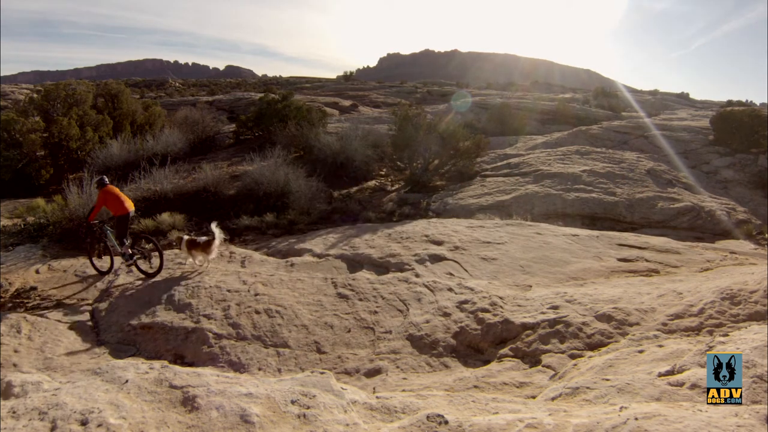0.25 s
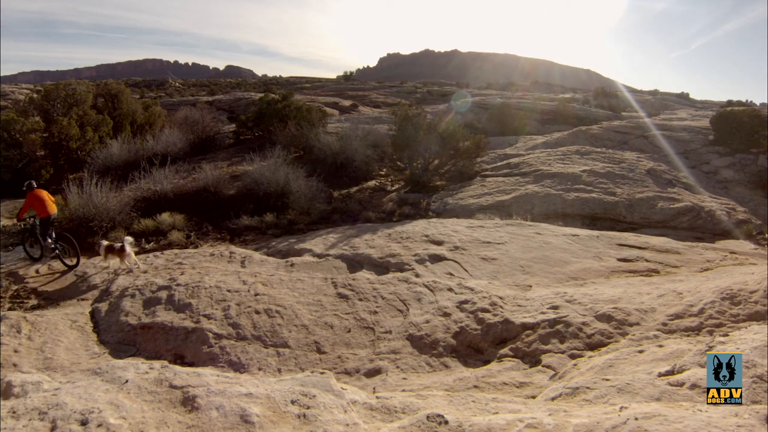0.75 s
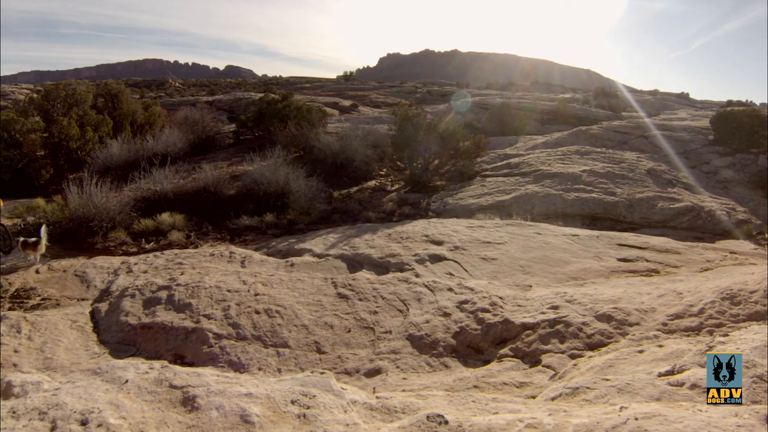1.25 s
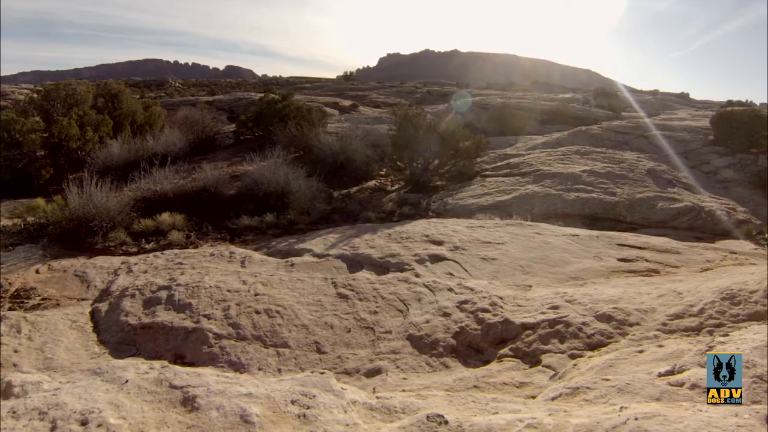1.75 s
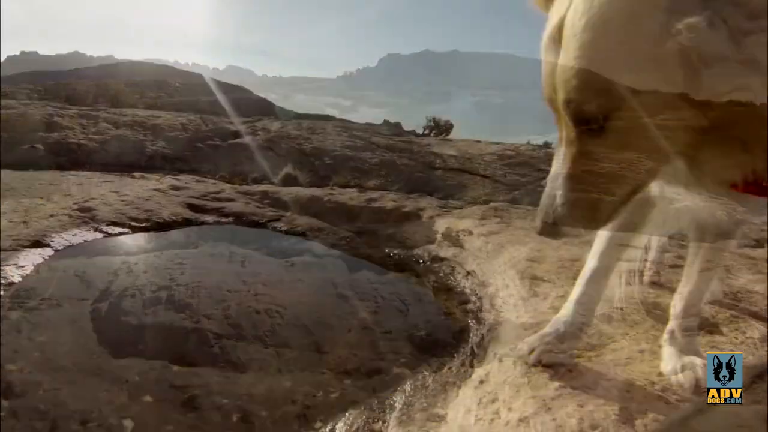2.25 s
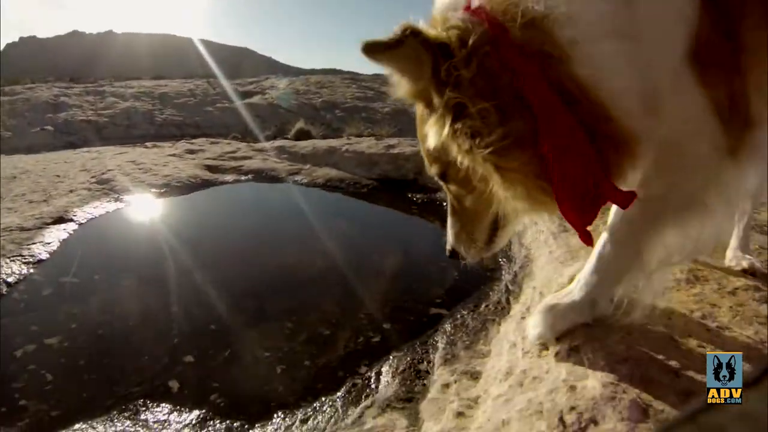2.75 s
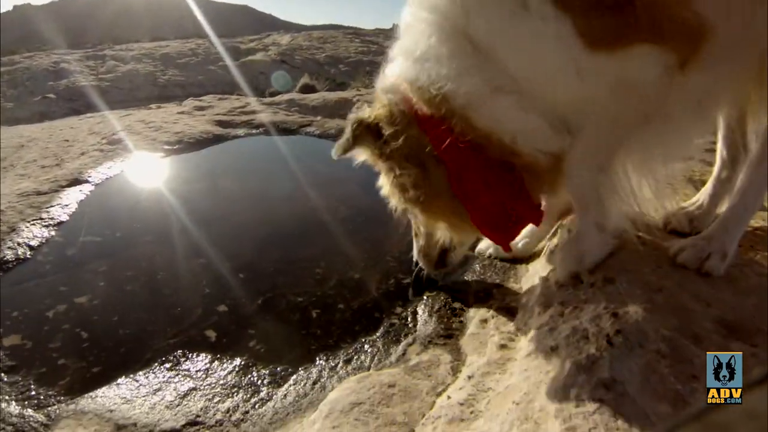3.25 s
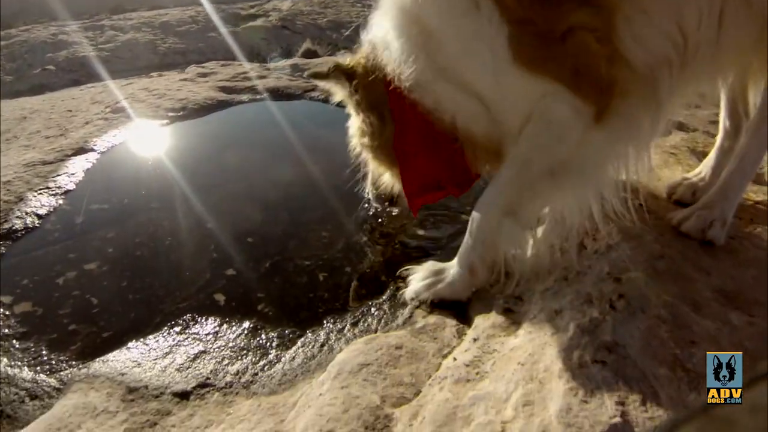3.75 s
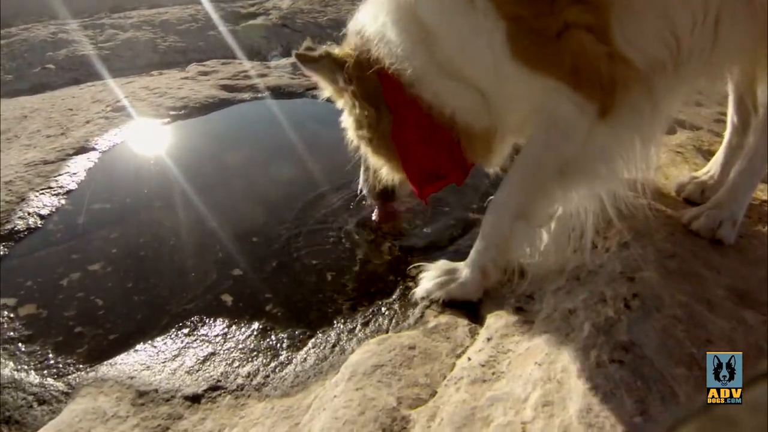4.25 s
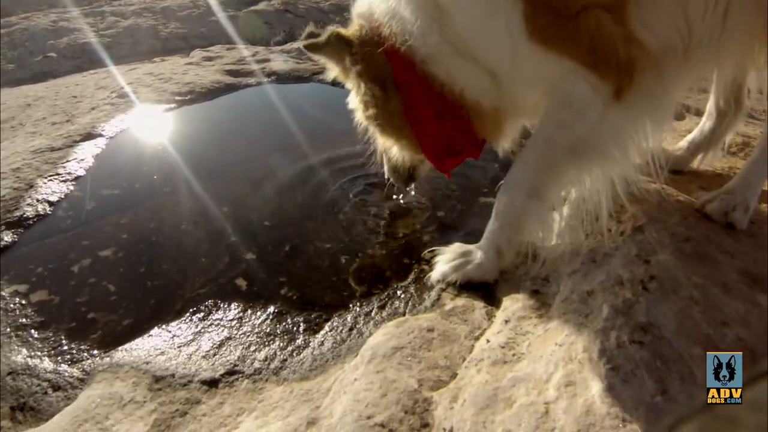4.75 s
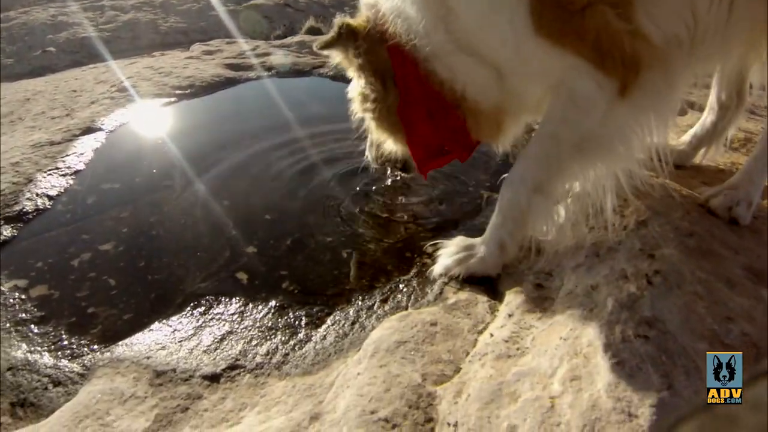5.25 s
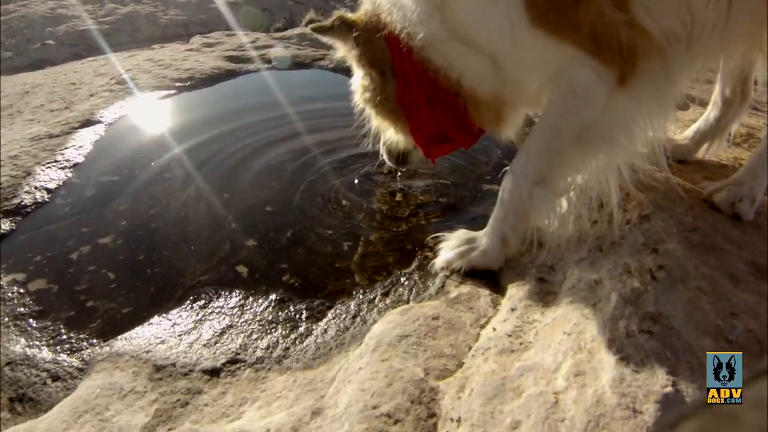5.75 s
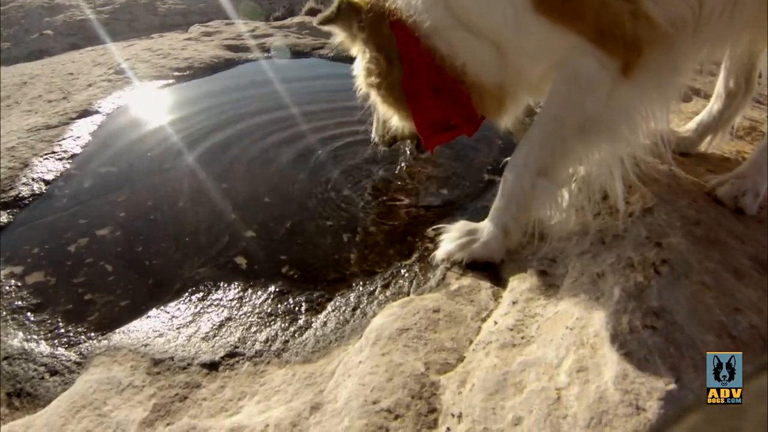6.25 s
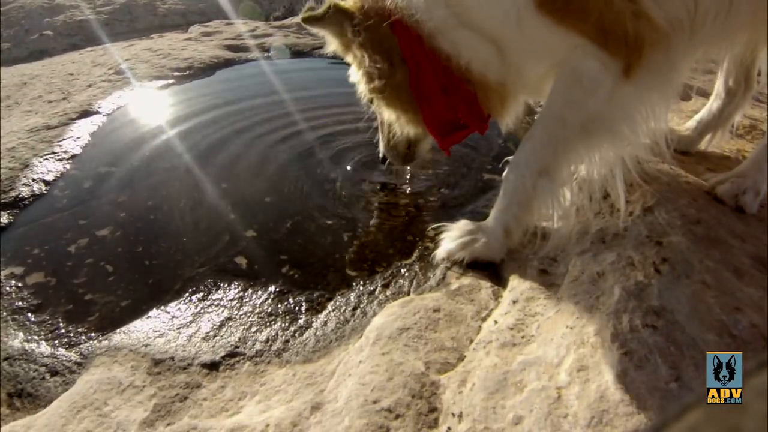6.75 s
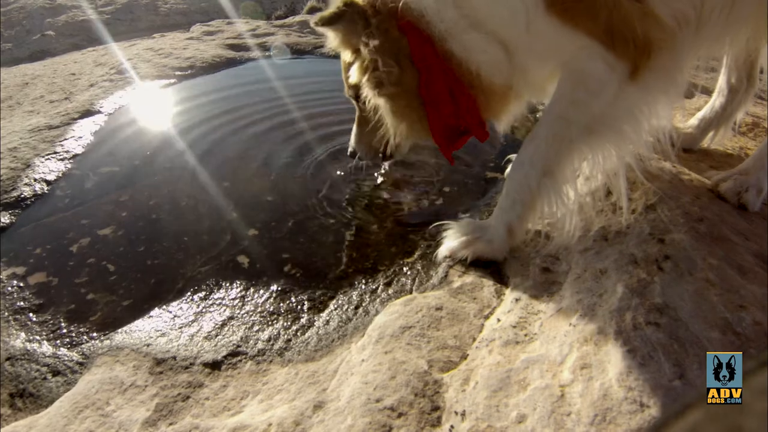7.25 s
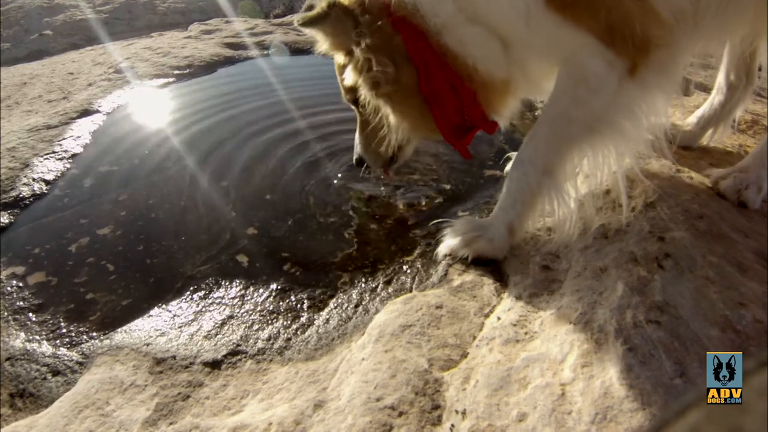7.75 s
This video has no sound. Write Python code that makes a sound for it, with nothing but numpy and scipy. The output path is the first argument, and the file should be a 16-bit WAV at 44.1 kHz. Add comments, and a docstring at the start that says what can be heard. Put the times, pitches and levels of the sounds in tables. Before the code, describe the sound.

First a bike bumps and crunches over rock, its hiss thinning as it leaves, with one faint creak. Then the sound switches to a quiet pool, steady low noise behind. Something strikes the microphone case hard, clipping briefly. A dog's tongue then scoops water about three times a second, stirred strongly at first by a paw, later lighter and regular, with soft drips. Open air, close microphone, very narrow stereo.

```python
"""A dog laps at a rock pool: low blips and small plinks ring as damped sines, bubbles gurgle, contacts tick.
Blows ring the damped modes of a camera case; each part has its own dull colouring; a paw thuds on rock.
Before this, a bicycle rolls away over bare rock: shaped noise makes tyre crunch, freewheel hiss and rumble,
with jolts and one creak. A faint noise floor and breeze lie behind; the sound is almost mono."""
import sys
import numpy as np
from scipy import signal
from scipy.fft import rfft, irfft, next_fast_len
from scipy.io import wavfile
from scipy.ndimage import map_coordinates

SR = 44100
rng = np.random.default_rng(int(sys.argv[2]) if len(sys.argv) > 2 else 0)


def dump_mix(stems):
    """Bounce the given channels to the path in sys.argv[1] as a 16-bit WAV at rate SR."""
    frames = np.atleast_2d(stems).T  # one column per channel
    limited = np.clip(frames, -1, 1)  # hard clip at full scale
    pcm = np.round(limited * 32767).astype(np.int16)
    wavfile.write(sys.argv[1], SR, pcm)


N = 353241


def amp(db):
    """Decibels to linear gain."""
    return 10 ** (np.asarray(db) / 20)


def unit(x):
    """Scales a signal to rms 1."""
    return x / np.sqrt(np.mean(x ** 2) + 1e-20)


def along(points, hz):
    """Reads a (Hz, value) curve on a log frequency axis."""
    f, v = np.transpose(points)
    return np.interp(np.log(hz + 1), np.log(f + 1), v)


def curves(rows):
    """Draws one automation curve, a value per sample, for each column after the time."""
    s, *cols = np.transpose(rows)
    return [np.interp(np.arange(N) / SR, s, c) for c in cols]


def wobble(rate):
    """A smooth random curve with rate knots a second."""
    return map_coordinates(rng.standard_normal(int(N * rate / SR) + 4), [np.arange(N) * rate / SR])


def filtered(x, response):
    """Multiplies the spectrum of x by a response of frequency."""
    m = next_fast_len(N + SR // 2)
    return irfft(rfft(x, m) * response(np.fft.rfftfreq(m, 1 / SR)), m)[..., :N]


def noise(spectrum, rough_db, rate):
    """Coloured noise of rms 1 whose level flutters."""
    raw = rng.standard_normal(N) * amp(rough_db * wobble(rate))
    return unit(filtered(raw, lambda hz: amp(along(spectrum, hz))))


def place(times, sounds):
    """Sums one row of sound for each start time."""
    at = np.round(np.asarray(times) * SR).astype(int)[:, None] + np.arange(sounds.shape[1])
    return np.bincount(at.ravel(), sounds.ravel(), N + SR)[:N]


def blips(db, hz, t60, rise, attack, size):
    """Damped sines, one row each; the pitch climbs by the share rise over the decay time."""
    t = np.arange(size) / SR
    db, hz, t60 = (np.asarray(v)[:, None] for v in (db, hz, t60))
    turns = hz * (t + .5 * rise * t * t / t60)
    envelope = amp(db - 60 * t / t60) * (1 - np.exp(-t / attack))
    return envelope * np.sin(2 * np.pi * turns)


def bursts(times, db, t60, attack, size, band_hz):
    """Short decaying bursts of band-passed noise, each scaled to its stated peak."""
    t = np.arange(size) / SR
    envelope = amp(-60 * t / t60) * (1 - np.exp(-t / attack))
    rows = rng.standard_normal((len(times), size)) * envelope
    rows = signal.sosfilt(signal.butter(3, band_hz, "bandpass", fs=SR, output="sos"), rows)
    peaks = np.abs(rows).max(1, keepdims=True)
    return place(times, rows / peaks * amp(db)[:, None])


def swells(top_s, db, width_s):
    """Rounded level swells, 10 dB down at width_s either side of the top."""
    t = (np.arange(8192) - 4096) / SR
    return place(top_s + t[0], amp(db[:, None] - 10 * np.abs(t / width_s) ** 1.4))


# Low pitched blips, plops of water and some knocks on the case: start_s [s],
# level_db [dB, before the ring and wash trims], pitch_hz [Hz, before a 0.96 scaling], t60_s [s]
LOW_BLIPS = [(2.817, -41, 515, 0.023), (2.925, -32.5, 800, 0.01), (3.537, -38.5, 540, 0.02),
             (3.646, -35, 750, 0.017), (3.658, -34.5, 1030, 0.023), (3.818, -35, 1130, 0.017),
             (3.834, -19.5, 1180, 0.0044), (3.849, -32.5, 830, 0.013), (3.868, -30, 1200, 0.0077),
             (3.948, -35.5, 990, 0.023), (4.02, -43, 920, 0.028), (4.087, -34, 1015, 0.01),
             (4.106, -23, 1110, 0.0068), (4.131, -23.5, 655, 0.0022), (4.209, -39, 690, 0.03),
             (4.244, -39, 705, 0.033), (4.311, -32, 630, 0.039), (4.33, -42, 835, 0.035),
             (4.336, -14.5, 730, 0.034), (4.365, -28, 740, 0.0079), (4.409, -32.5, 775, 0.033),
             (4.426, -28, 790, 0.015), (4.448, -26, 720, 0.0046), (4.48, -38, 900, 0.012),
             (4.506, -29, 910, 0.024), (4.526, -14.5, 730, 0.0075), (4.539, -14, 610, 0.026),
             (4.548, -23, 590, 0.015), (4.651, -30, 700, 0.014), (4.665, -11.5, 695, 0.016),
             (4.671, -16.5, 634, 0.029), (4.711, -34, 1160, 0.0227), (4.729, -26.5, 830, 0.0072),
             (4.744, -26, 680.9, 0.0095), (4.949, -36, 768, 0.011), (4.958, -28, 700, 0.026),
             (4.987, -40.5, 1150, 0.029), (5.053, -38.5, 1160, 0.023), (5.06, -32, 1080, 0.017),
             (5.087, -25.5, 850, 0.012), (5.118, -32, 780, 0.0096), (5.345, -36.5, 960, 0.013),
             (5.353, -30.5, 1163, 0.027), (5.374, -31, 840, 0.012), (5.402, -32.5, 680, 0.01),
             (5.499, -32.5, 560, 0.0063), (5.551, -39, 690, 0.037), (5.694, -20.5, 1105, 0.018),
             (5.701, -28, 1010, 0.025), (5.716, -10.5, 826, 0.015), (5.727, -32, 590, 0.06),
             (5.772, -26.5, 810, 0.021), (5.884, -35, 503, 0.017), (5.994, -36, 1010, 0.022),
             (6.001, -28.5, 1110, 0.029), (6.019, -25, 770, 0.0074), (6.065, -36, 890, 0.0072),
             (6.138, -36, 467, 0.016), (6.346, -31, 950, 0.019), (6.353, -27.5, 1094, 0.032),
             (6.38, -32, 730, 0.022), (6.667, -32, 1044, 0.024), (6.677, -28, 640, 0.0055),
             (6.684, -30, 800, 0.0086), (6.691, -29.5, 680, 0.013), (6.72, -34.5, 640, 0.01),
             (6.731, -33.5, 900, 0.013), (6.785, -35.5, 620, 0.0098), (6.81, -40, 520, 0.018),
             (6.853, -28.5, 646, 0.012), (6.872, -27.5, 790, 0.0058), (7.014, -28, 983, 0.03),
             (7.042, -33, 840, 0.0067), (7.083, -35, 830, 0.012), (7.117, -44, 650, 0.025),
             (7.199, -36, 700, 0.014), (7.281, -33.5, 624, 0.021), (7.32, -29.5, 1110, 0.038),
             (7.339, -29, 674, 0.01), (7.365, -29, 734, 0.009), (7.396, -42, 720, 0.025),
             (7.447, -41, 520, 0.025), (7.674, -40, 940, 0.03), (7.681, -39, 1000, 0.015),
             (7.707, -23, 620, 0.0051), (7.739, -33.5, 570, 0.042), (7.755, -38, 644, 0.018),
             (7.775, -41, 765, 0.025), (7.791, -41.5, 830, 0.012), (8.002, -19, 635, 0.0097)]
# Wet noise around low blips and stirred water: frequency_hz [Hz], density_db [relative dB per Hz]
WASH_SPECTRUM = [(200, -24), (420, -4), (650, -4), (1100, -6), (1450, -21.5), (2600, -21.5), (5000, -53)]
# Fine spray, strongest in a band near the vent of the case: frequency_hz [Hz], density_db [relative dB per Hz]
FIZZ_SPECTRUM = [(1200, -18), (1700, -3), (2250, -0.5), (2600, 0), (3000, -3), (3500, -9), (5000, -12.5),
                 (9000, -30), (14000, -43)]
BLIP_ATTACK = 0.051  # share of a blip's decay time


def low_blips():
    """A damped sine rings briefly, climbing in pitch, with a ragged wet wash and a little spray."""
    s, db, hz, t60 = np.transpose(LOW_BLIPS)
    attack = BLIP_ATTACK * t60[:, None]
    ring = place(s, blips(db + 7.5, 0.96 * hz, t60, rise=0.19, attack=attack, size=2048))
    t = np.arange(2048) / SR
    swell = place(s, amp(db[:, None] - 14.0 - 60 * t / 0.047) * (1 - np.exp(-t / 0.00055)))
    wash = noise(WASH_SPECTRUM, rough_db=4.5, rate=200)
    spray = amp(-19) * noise(FIZZ_SPECTRUM, rough_db=6, rate=200)
    return ring + swell * (wash + spray)


VENT_HZ, VENT_SCATTER = 2580, 0.084  # pitch of the case vent; log spread of contact pitches around it


def bubble_stream():
    """Small air bubbles ring at random moments, each a short damped sine of rising pitch; rms 1."""
    draw = rng.random((2600, 2))
    hz = 720 * np.exp(.5 * np.tanh(0.63 * rng.standard_normal(len(draw))))
    size_db = -3 * np.log(draw[:, 1] + 0.0085)
    return unit(place(8 * draw[:, 0], blips(size_db, hz, 12 / hz, rise=0.19, attack=0.00036, size=1024)))


# The tongue scoops, then water falls back: start_s [s], gurgle_db [dB],
# fall_s [s after start_s], fall_gurgle_db [dB]
LAPS = [(3.58, -53, 0.171, -64.5), (3.83, -65, 0.13, -45.5), (4.099, -53, 0.028, -40),
        (5.059, -58, 0.15, -66), (5.35, -48, 0.2, -41), (5.701, -41, 0.22, -54), (5.998, -46.5, .14, -70),
        (6.356, -47.5, 0.16, -53.5), (6.67, -54, 0.187, -42.5), (7.017, -46, .185, -40),
        (7.321, -51, 0.12, -44.5), (7.69, -43.5, 0.26, -61)]
# A paw stirs the water: time_s [s], gurgle_db [dB]
STIR = [(4.195, -85), (4.208, -47.5), (4.255, -42), (4.28, -52), (4.34, -33), (4.39, -47), (4.42, -42),
        (4.48, -58), (4.535, -27), (4.57, -47.5), (4.605, -60), (4.63, -53), (4.666, -29), (4.72, -56.5),
        (4.8, -62.5), (4.9, -103), (4.955, -40.5), (5.0, -84)]
# The tongue touches the surface just before a scoop; the fizz is relative to its gurgle
DIP_S, DIP_WIDTH_S, DIP_DB, DIP_FIZZ_DB = -0.059, 0.0078, -55, -7
SCOOP_TOP_S, SCOOP_WIDTH_S, SCOOP_FIZZ_DB = 0.062, 0.031, -25  # the swell after a scoop
BACK_WIDTH_S, BACK_FIZZ_DB = 0.0095, -13  # the swell of the falling water
STIR_FIZZ_DB, STIR_WASH_DB = -10.5, -9  # fizz and wet noise relative to the paw's gurgle
VENT_WIDTH_HZ, VENT_RING_DB = 180, -4  # stirred water sings in the vent; level relative to its fizz


def slosh():
    """Many small bubbles gurgle with a fine fizz: three swells in every lap, and under the stirring paw."""
    s, db, back_s, back_db = np.transpose(LAPS)
    dip = swells(s + DIP_S, DIP_DB + 0 * s, DIP_WIDTH_S)
    scoop = swells(s + SCOOP_TOP_S, db, SCOOP_WIDTH_S)
    back = swells(s + back_s, back_db, BACK_WIDTH_S)
    t = np.arange(N) / SR
    stir = amp(curves(STIR)[0]) * (t > STIR[0][0]) * (t < STIR[-1][0])

    gurgle = (amp(-63) + dip + scoop + back + stir) * bubble_stream()
    fizz_level = amp(-68) + amp(SCOOP_FIZZ_DB) * scoop + amp(BACK_FIZZ_DB) * back + amp(DIP_FIZZ_DB) * dip
    fizz = fizz_level * noise(FIZZ_SPECTRUM, rough_db=5.0, rate=180)

    vent_response = lambda f: VENT_WIDTH_HZ / np.hypot(2 * (f - VENT_HZ), VENT_WIDTH_HZ)
    vent = unit(filtered(rng.standard_normal(N), vent_response))
    stir_fizz = noise(FIZZ_SPECTRUM, rough_db=6.0, rate=160) + amp(VENT_RING_DB) * vent
    stir_wash = noise(WASH_SPECTRUM, rough_db=3.0, rate=93)
    stirred = stir * (amp(STIR_FIZZ_DB) * stir_fizz + amp(STIR_WASH_DB) * stir_wash)
    return gurgle + stirred + fizz


# Small plinks from drops, plops and stirred water: start_s [s], level_db [dB], pitch_hz [Hz, at the start]
PLINKS = [(3.49, -41.5, 520), (3.621, -40.5, 522), (3.735, -42, 520), (3.967, -40.5, 2000),
          (4.232, -49, 1900), (4.51, -36, 1750), (4.539, -18, 1730), (4.955, -42, 1780),
          (4.987, -38.5, 1940), (5.063, -45.5, 3680), (5.133, -36.5, 2130), (5.287, -35.5, 1170),
          (5.61, -42, 1990), (6.208, -38, 1430), (6.6, -38.5, 1104), (7.02, -39.5, 3840),
          (7.256, -39, 1090), (7.325, -39, 2150), (7.526, -35.5, 2080), (7.566, -46, 3350),
          (7.602, -51, 2900), (7.624, -50, 1950), (7.624, -52, 1250), (7.664, -38.5, 1100),
          (7.682, -43, 4000), (7.731, -38, 1640), (7.743, -44, 2800), (7.773, -46, 1640),
          (7.844, -48, 4300), (7.865, -53, 2500), (7.928, -50, 1470)]


def plinks():
    """Small damped sines with rising pitch; many mostly fainter ones sound at random."""
    s, db, hz = np.transpose(PLINKS)
    draw = rng.random((150, 3))
    s = np.r_[s, 3.4 + 4.6 * draw[:, 0]]
    db = np.r_[db, -64 + 13 * draw[:, 1]]
    hz = np.r_[hz, 1000 * 4.5 ** draw[:, 2]]
    return place(s, blips(db, hz, 0.014 + 18 / hz, rise=0.22, attack=0.00056, size=1024))


# Sharp contacts of drops, lips, claws and grit: start_s [s], level_db [dB, peak of the crack],
# treble_db [dB relative to level_db, before a small trim]
TICKS = [(2.31, -47, -12), (2.874, -32.5, -10), (2.924, -24, -10), (3.173, -32, -20), (3.177, -31.5, -25),
         (3.186, -25, -29), (3.224, -25, -21), (3.239, -33, -18.5), (3.261, -38, -16), (3.272, -37, -17),
         (3.283, -4.5, -21.5), (3.294, -5, -18), (3.302, -26, -20), (3.309, -24, -31), (3.595, -42, -14),
         (3.851, -35, -12), (3.867, -41, -29), (3.948, -31, -10.5), (4.153, -43.5, -11), (4.334, -37, -30),
         (4.338, -21.5, -38), (4.364, -34, -21), (4.425, -35.5, -20), (4.45, -38.5, -8), (4.496, -35, -16),
         (4.508, -30.5, -27), (4.532, -35, -29), (4.539, -18.5, -23), (4.655, -55, -23.5),
         (4.665, -20, -25), (4.781, -42.5, 1), (4.806, -48, -18), (5.132, -44, -26), (5.297, -38.5, -21),
         (5.551, -46, 1), (5.714, -22.5, -39), (6.207, -38.5, -1.5), (6.356, -40, -12), (6.853, -46, -14),
         (7.04, -44.5, 1.5), (7.087, -43, -6), (7.194, -41, -17), (7.277, -47, -8), (7.326, -44, -2.5),
         (7.526, -48, 6.5), (7.729, -36, -16)]


def ticks():
    """A contact rings near the vent's pitch over a wide crack and a treble snap; a softer scatter trails it."""
    s, db, treble_db = np.transpose(TICKS)
    hz = VENT_HZ * np.exp(VENT_SCATTER * rng.standard_normal(len(s)))
    ring = place(s, blips(db + 0.5, hz, 0.013 + 0 * s, rise=0, attack=0.00057, size=1024))
    crack = bursts(s, db, t60=0.013, attack=0.00044, size=1024, band_hz=[1450, 3900])
    treble = bursts(s, db + treble_db + 0.5, t60=0.0097, attack=0.00079, size=1024, band_hz=[4500, 13000])
    spray = bursts(s, db - 21, t60=0.06, attack=0.003, size=2048, band_hz=[2000, 3900])
    return ring + crack + treble + spray


# Blows on the case: start_s [s], level_db [dB, before the part trims],
# tilt_db [dB per octave from the second mode, up to 1 kHz]
KNOCKS = [(3.173, -25, 9), (3.177, -16.5, 10), (3.187, -5, -9), (3.219, -21, 2), (3.23, -24, 2),
          (3.283, 2.5, 0), (3.294, -1.5, -4.5), (3.303, -5.5, -4), (3.309, -8, 1)]
# Modes of the case: pitch_hz [Hz], level_db [dB relative to the blow, before its trim], t60_s [s]
CASE_MODES = [(330, -5, 0.04), (525, -4, 0.065), (690, -4, 0.025), (880, 2.5, 0.028), (2520, -35, 0.12),
              (3300, -35, 0.068), (3670, -45, 0.07)]


def knocks():
    """Every blow is a rough thud and a low push that ring the same case modes at new strengths."""
    hz, level_db, t60 = np.transpose(CASE_MODES)
    octaves = np.log2(np.minimum(hz, 1000) / hz[1])
    rows = []
    for _, blow_db, tilt_db in KNOCKS:
        mode_db = blow_db - 4.5 + level_db + tilt_db * octaves + rng.normal(0, 3.1, len(hz))
        rows.append(blips(mode_db, hz, t60, rise=0, attack=0.00073, size=4096).sum(0))
    s, db, _ = np.transpose(KNOCKS)
    thud = bursts(s, db - 6.5, t60=0.025, attack=0.0026, size=2048, band_hz=[330, 950])
    push = blips(db - 27.0, 110 + 0 * s, 0.12 + 0 * s, rise=0.99, attack=0.016, size=4096)
    return place(s, np.array(rows) + push) + thud


# A paw shifts on the rock: start_s [s], level_db [dB peak]
THUDS = [(4.953, -42), (5.499, -38), (7.44, -42), (7.705, -51)]


def thuds():
    """Soft low pushes through the rock, as low-band noise bursts."""
    s, db = np.transpose(THUDS)
    return bursts(s, db, t60=0.059, attack=0.003, size=4096, band_hz=[30, 220])


# Bumps under the bicycle: start_s [s], level_db [dB, before the part trims],
# thump_db [dB relative to level_db, before a 3 dB lift]
JOLTS = [(0.063, -32, -9), (0.084, -31, -5), (0.099, -32.5, -12), (0.107, -27.5, -16), (0.158, -33, -8),
         (0.205, -27, -13), (0.216, -34, -10), (0.244, -38, -20), (0.258, -35, -18), (0.282, -36, -7),
         (0.345, -24.5, -25), (0.387, -35, -15), (0.436, -30.5, -20), (0.444, -29, -22), (0.46, -32.5, -8),
         (0.483, -32.5, -23), (0.632, -33, -15), (0.652, -34.5, -12), (0.803, -27, 0.5),
         (0.832, -27.5, -13), (0.844, -28, -13), (0.887, -24.5, -10), (0.903, -29, -18),
         (0.919, -25.5, -27), (1.031, -30, -6), (1.061, -31, -16), (1.306, -37, -5), (1.38, -18.5, -1.5),
         (1.46, -35.5, -10), (1.554, -39.5, 12), (1.57, -32, -2), (1.693, -36, -12), (1.728, -23, -5),
         (1.785, -31, -5), (1.99, -26, -3), (1.996, -31.5, -18), (2.188, -24, 1.5), (2.194, -33, -1.5)]
SHAKE_DB, SHAKE_T60_S = -24, 0.13  # the shaking that a jolt leaves, relative to the jolt; its decay


def jolts():
    """Each bump is a dull rattle with a faint bright edge, a ring of the frame and one slow push and rebound."""
    s, db, thump_db = np.transpose(JOLTS)
    thump = blips(db + thump_db + 3.0, 80 + 0 * s, 0.038 + 0 * s, rise=-0.1, attack=0.0011, size=2048)
    frame = blips(db - 2.0, 900 + 0 * s, 0.027 + 0 * s, rise=0, attack=0.0006, size=2048)
    rattle = bursts(s, db - 3.0, t60=0.032, attack=0.00075, size=2048, band_hz=[300, 1700])
    edge = bursts(s, db - 16, t60=0.018, attack=0.0008, size=2048, band_hz=[1700, 4000])
    return rattle + edge + place(s, thump + frame)


def shaking(s, db):
    """The decaying level of shaking that each jolt leaves behind."""
    decay = amp(SHAKE_DB - 60 * np.arange(8192) / SR / SHAKE_T60_S)
    return place(s, amp(db)[:, None] * decay)


# Grit under the tyres: frequency_hz [Hz], density_db [relative dB per Hz]
CRUNCH_SPECTRUM = [(120, -64), (200, -2.5), (616, -6), (1020, -6), (2140, -19.5), (2360, -29), (2820, -68),
                   (3500, -26), (4550, -36), (7700, -120)]


def crunch(ground_db):
    """Tyres grind grit: ragged noise follows the ground's roughness and the shaking after jolts."""
    s, db, _ = np.transpose(JOLTS)
    level = (amp(ground_db) + shaking(s, db)) * amp(-4.0 + 1.4 * wobble(22.44))
    return level * noise(CRUNCH_SPECTRUM, rough_db=3.5, rate=180)


# Low rolling noise: frequency_hz [Hz], density_db [relative dB per Hz]
RUMBLE_SPECTRUM = [(12, -51), (20, 8.5), (166, 2.5), (209, 4), (300, -5), (390, -76), (660, -120)]
RUMBLE_DB = -7  # relative to the ground's roughness


def rumble(ground_db):
    """Rolling over rock makes low noise, raised by the shaking after each thump."""
    s, db, thump_db = np.transpose(JOLTS)
    level = amp(ground_db + RUMBLE_DB) + shaking(s, db + thump_db + 3)
    return level * noise(RUMBLE_SPECTRUM, rough_db=4.5, rate=33)


# Freewheel hiss: frequency_hz [Hz], density_db [relative dB per Hz]
HISS_SPECTRUM = [(1530, -26), (2600, -20), (2820, -12), (5880, -5.5), (8070, 3), (9510, -12), (10800, -6),
                 (12300, 3), (13500, 0.5), (13800, -13.5)]
# Parts of the wheel that sing: pitch_hz [Hz], width_hz [Hz], level_db [relative dB]
WHEEL_BANDS = [(1895, 71, 1.5), (2332, 67, 0.5), (6480, 62, -9), (7890, 160, -3), (8360, 200, -9),
               (9000, 110, -15)]


def freewheel(hiss_db):
    """The freewheel hisses while noise excites narrow resonant bands of the wheel."""
    bands = lambda f: sum(amp(db) * w / np.hypot(2 * (f - c), w) for c, w, db in WHEEL_BANDS)
    excitation = rng.standard_normal(N) * amp(2.9 * wobble(25))
    singing = amp(hiss_db + 1.4 * wobble(9.7)) * unit(filtered(excitation, bands))
    hiss = amp(hiss_db + 0.2 * wobble(17.3)) * noise(HISS_SPECTRUM, rough_db=2.0, rate=68)
    return hiss + singing


CREAK_S, CREAK_LENGTH_S = 1.785, 0.03  # middle and half length
CREAK_DB, CREAK_HZ, CREAK_RISE = -45, 850, 0.14  # mid level, middle pitch, share climbed over its length


def creak():
    """The frame creaks once: a climbing tone with a rough level."""
    t = np.arange(N) / SR - CREAK_S
    hz = CREAK_HZ * (1 + .5 * CREAK_RISE * np.clip(t / CREAK_LENGTH_S, -2, 1))
    level_db = CREAK_DB - 10 * (t / CREAK_LENGTH_S) ** 2 + 6.3 * wobble(250)
    return amp(level_db) * np.sin(2 * np.pi * np.cumsum(hz) / SR)


def ride_air():
    """Open air around the bicycle, as faint bright noise."""
    spectrum = [(1500, -9.5), (2500, -3.0), (7000, -11.5), (12500, -9.0), (13200, -80)]  # Hz, relative dB
    return amp(-57) * noise(spectrum, rough_db=2.0, rate=30)


# The bicycle moves away: time_s [s], hiss_db [dB], ground_db [dB, roughness of the ground before part trims]
RIDE = [(0.01, -49.5, -45), (0.35, -52.5, -41), (0.54, -51, -44), (0.64, -51, -38.5), (0.75, -51.5, -46),
        (0.9, -47.5, -36), (1.01, -51.5, -46.5), (1.3, -58.5, -50.5), (1.6, -59, -46.5), (1.79, -60.5, -49),
        (1.87, -69, -52.5), (2.22, -81.5, -54)]


def ride():
    """The bicycle rolls away as its freewheel and tyre noise fade."""
    hiss_db, ground_db = curves(RIDE)
    return freewheel(hiss_db) + crunch(ground_db) + rumble(ground_db) + jolts() + creak() + ride_air()


# Noise floor at the pool: frequency_hz [Hz], density_db [relative dB per Hz]
FLOOR_SPECTRUM = [(12, -36), (20, -3.5), (60, -13), (147, -15), (358, -18.5), (482, -28), (1310, -28),
                  (1810, -33.5), (12600, -35), (16400, -84.5), (22000, -120)]
FLOOR_DB, FLOOR_TOP_HZ = -59, 13000  # level before the band limit; the band limit


def noise_floor():
    """A faint steady noise floor, band-limited at 13 kHz."""
    floor = noise(FLOOR_SPECTRUM, rough_db=1.9, rate=22)
    return amp(FLOOR_DB) * filtered(floor, lambda hz: hz < FLOOR_TOP_HZ)


def breeze():
    """Puffs of breeze, as low noise whose level drifts."""
    spectrum = [(20, -0.5), (120, -6), (300, -20.0), (600, -120)]  # Hz, relative dB
    return amp(-60.5 + 3.4 * wobble(7)) * noise(spectrum, rough_db=1.5, rate=35)


def pool():
    """The dog at the water, over the noise floor and the breeze."""
    return low_blips() + slosh() + plinks() + ticks() + knocks() + thuds() + noise_floor() + breeze()


# Hiss that differs between the channels: frequency_hz [Hz], density_db [relative dB per Hz]
SPREAD_SPECTRUM = [(20, -28), (1500, -30.5), (3000, -25.5), (5000, -24.5), (9000, -26), (12000, -50)]


def channel_hiss():
    """Very faint noise, added to one channel and subtracted from the other, widens the image."""
    return amp(-70.5) * noise(SPREAD_SPECTRUM, rough_db=4.0, rate=3.98)


CUT_S = 2.228  # the ride gives way to the pool


def scene():
    """The ride, then the pool after a quick 11 ms crossfade, with slight stereo hiss."""
    after = np.clip((np.arange(N) / SR - CUT_S) / 0.011, 0, 1)
    mid = (1 - after) * ride() + after * pool()
    side = channel_hiss()
    return np.array([mid + side, mid - side])


TOP_HZ = 15700  # band limit


def record(dry):
    """The loudest knocks flatten at full scale; nothing is kept above the band limit."""
    return filtered(np.clip(dry, -1, 1), lambda hz: hz < TOP_HZ)


dry = scene()
out = record(dry)
dump_mix(out)
```